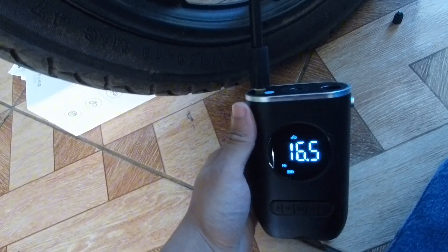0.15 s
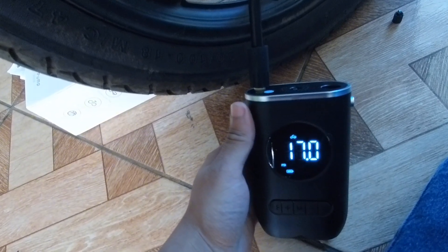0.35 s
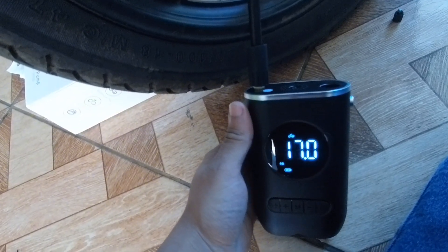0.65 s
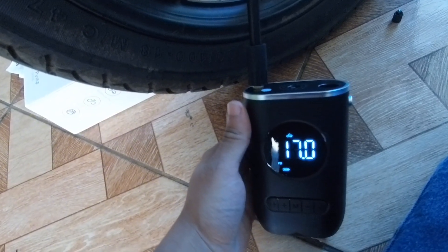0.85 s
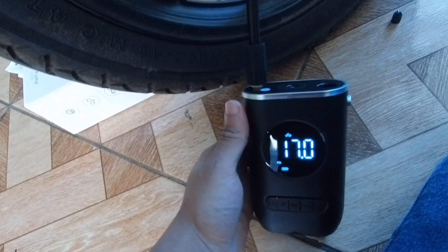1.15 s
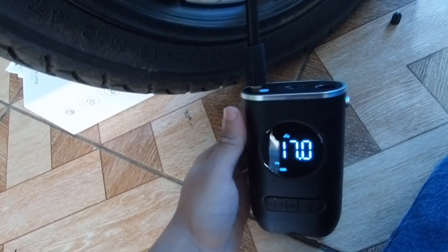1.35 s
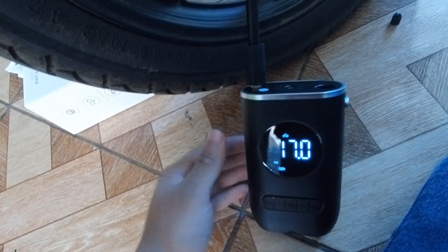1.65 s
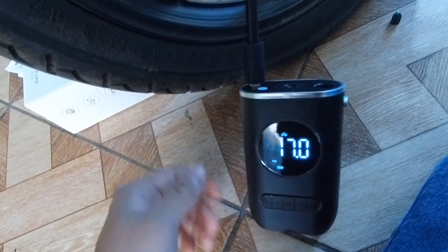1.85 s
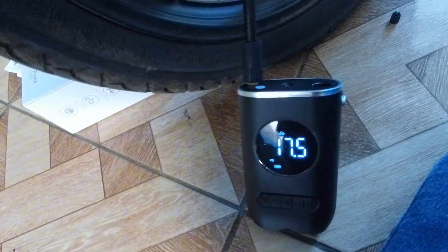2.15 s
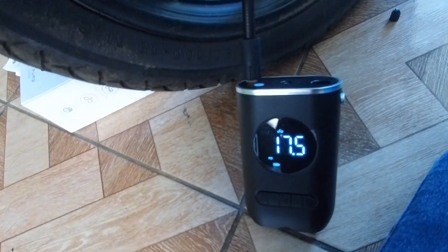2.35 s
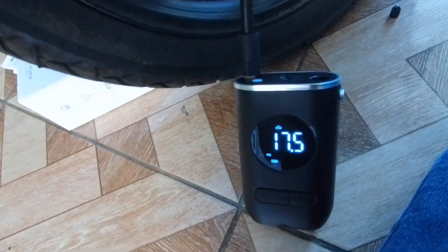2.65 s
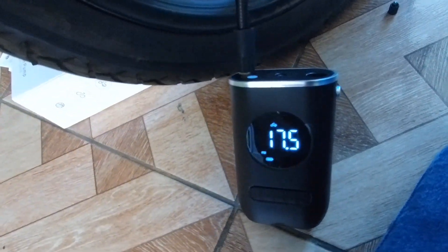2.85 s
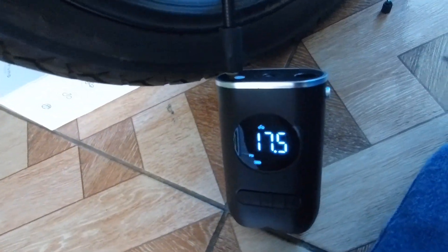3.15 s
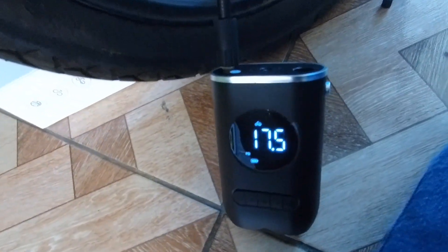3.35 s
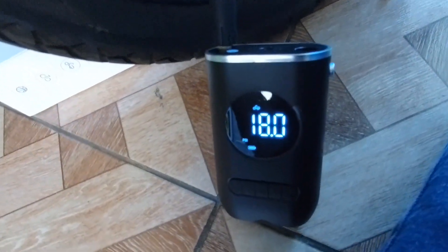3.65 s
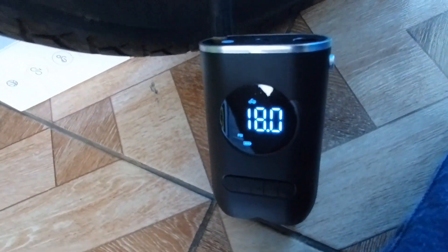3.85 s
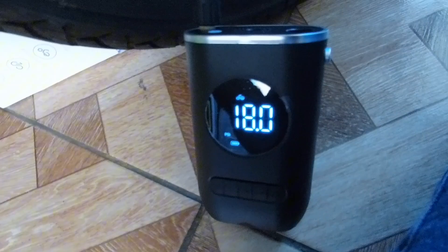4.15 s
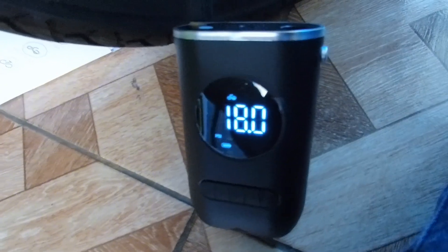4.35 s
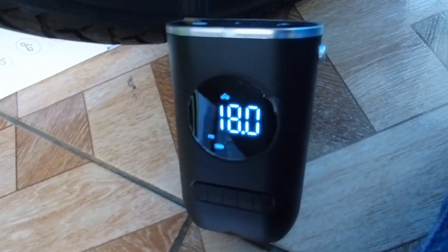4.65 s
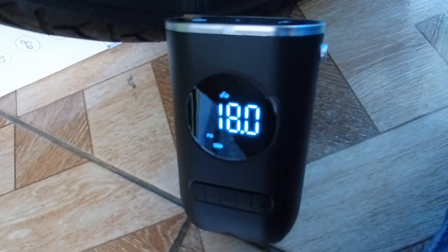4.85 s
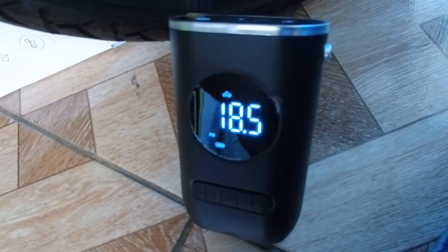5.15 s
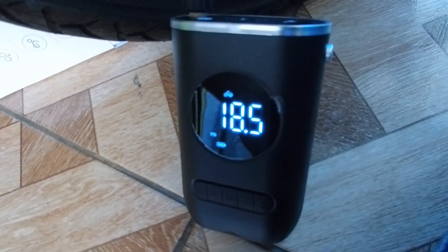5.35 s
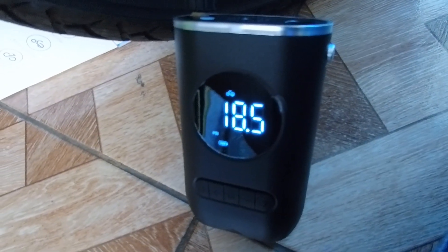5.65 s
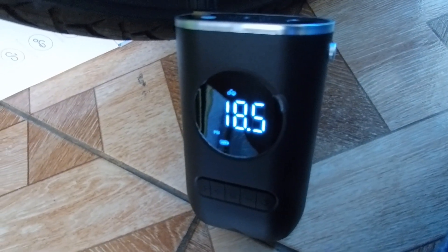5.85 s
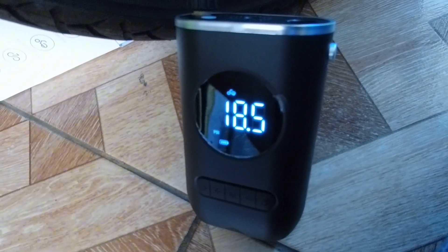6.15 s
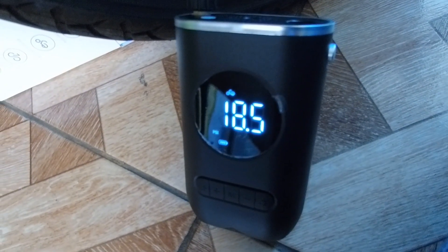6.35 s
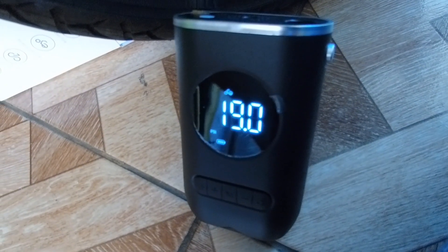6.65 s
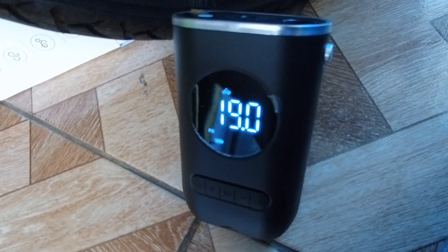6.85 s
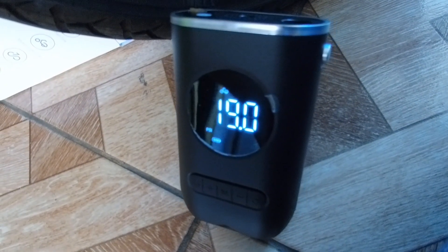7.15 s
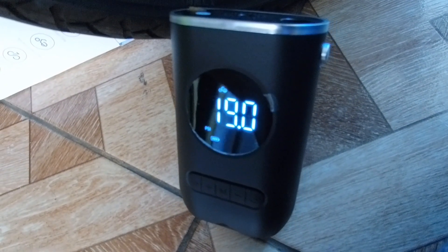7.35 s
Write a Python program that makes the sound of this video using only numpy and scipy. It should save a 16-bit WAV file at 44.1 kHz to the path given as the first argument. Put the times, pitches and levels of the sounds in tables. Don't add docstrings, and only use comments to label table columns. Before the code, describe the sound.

A small battery piston air pump is already running and never stops, filling a tyre on a tiled floor. About fifty-five valve pops a second merge into a harsh, low buzzing drone, with hollow ringing of the plastic case around the middle range, a thin gear whine near 2.5 kHz and steady pulsing air hiss. From 0 to 1.3 s it is hand-held and even; by about 1.8 s the hand has let go. Between 2 and 4 s it leans and rocks, the pitch dipping very slightly, with looser buzzing and rattling around 3.1 to 4.1 s. The phone microphone approaches from about 3 s, louder by 4 s. From 4.3 to 6 s whine and hiss brighten strongly on the left, with a faint loose-cover ring peaking near 5.6 s. After 6.1 s that brightness drops back, and the close, dry drone continues to the abrupt end at 7.5 s.

```python
import sys
import numpy as np
from scipy import signal
from scipy.fft import rfft, irfft, next_fast_len
from scipy.io import wavfile
from scipy.ndimage import map_coordinates

SR = 44100
rng = np.random.default_rng(int(sys.argv[2]) if len(sys.argv) > 2 else 0)


def to_wav(sig):
    pcm = np.clip(np.atleast_2d(sig), -1, 1) * 32767
    pcm = np.round(pcm).astype(np.int16)
    wavfile.write(sys.argv[1], SR, pcm.T)


def volts(x):
    e = np.asarray(x, float) / 20
    return 10 ** e


N = 331191


def unit(x):
    return x / np.sqrt(np.mean(x ** 2) + 1e-20)


def along(points, hz):
    point_hz, values = np.transpose(points)
    return np.interp(np.log(hz + 1), np.log(point_hz + 1), values)


def curves(rows):
    start_s, *columns = np.transpose(rows)
    return [np.interp(np.arange(N) / SR, start_s, column) for column in columns]


def wobble(rate):
    knots = rng.standard_normal(int(N * rate / SR) + 4)
    return map_coordinates(knots, [np.arange(N) * rate / SR])


def filtered(x, response):
    size = next_fast_len(N + SR // 2)
    return irfft(rfft(x, size) * response(np.fft.rfftfreq(size, 1 / SR)), size)[..., :N]


def hiss(spectrum):
    return unit(filtered(rng.standard_normal(N), lambda hz: volts(along(spectrum, hz))))


def modes(table):
    def response(f):
        total = 0
        for k, (hz, width, db) in enumerate(table):
            total = total + (-1) ** k * volts(db) * 1j * f * width / (hz * hz - f * f + 1j * f * width)
        return total
    return response


def struck(table, delay_ms, first, second, after_ms):
    def wait(f, ms):
        return np.exp(-2j * np.pi * f * ms / 1000)
    return lambda f: modes(table)(f) * wait(f, delay_ms) * (first + second * wait(f, after_ms))


def hump(turn, centre, width):
    return np.exp((np.cos(2 * np.pi * (turn - centre)) - 1) / (2 * np.pi * width) ** 2)


def pulses(turn, centre, jitter, scatter_db):
    count = np.arange(int(turn[-1]) + 1)
    luck = rng.standard_normal((len(count), 2))
    late = jitter[(count * (N - 1) / turn[-1]).astype(int)] * luck[:, 0]
    at = np.interp(count + centre + late, turn, np.arange(N))
    taps = np.floor(at)[:, None] + np.arange(-7, 9)
    offset = taps - at[:, None]
    shape = np.sinc(offset) * np.cos(np.pi * offset / 16) ** 2
    shape = shape * (at < N - 1)[:, None] * volts(scatter_db * luck[:, 1:])
    return np.bincount(np.clip(taps, 0, N - 1).astype(int).ravel(), shape.ravel(), N)


def panned(x, lr_db):
    gains = volts([lr_db / 2, -lr_db / 2])
    return x * gains / np.mean(gains, axis=0)


# start_s, leaning [0-1], phone_near [0-1], rattle [0-1]
POSTURE = [(0, 0.18, 0.09, 0), (1.7, 0, 0.05, 0.12), (2, 0.38, 0.22, 0.07), (2.33, 0.15, 0.13, 0.16),
           (2.42, 0.83, 0.22, 0), (3.02, 0.63, 0.26, 0.1), (3.1, 0.24, 0.2, 1), (3.27, 0.16, 0.58, 0.15),
           (3.35, 0.66, 0.35, 0.6), (3.58, 0.5, 0.3, 0.55), (3.66, 0.05, 0.76, 0.4), (3.85, 0, 0.57, 0.45),
           (4.04, 0.1, 0.77, 0.9), (4.2, 0.14, 0.82, 0), (5.6, 0.12, 0.92, 0.02), (6.1, 0.16, 0.78, 0.17),
           (7.51, 0.03, 0.82, 0.4)]


def posture():
    return [np.clip(c, 0, 1) for c in curves(POSTURE)]


# start_s, nearness_db, left_port_facing_vents [0-1]
PHONE_PATH = [(0, 0, 0.11), (1.9, 0.5, 0), (2.6, 0.5, 0.15), (3.1, 0.5, 0), (4.1, 3.5, 0),
              (4.34, 3.5, 0.48), (4.5, 3.5, 0.74), (4.7, 4, 0.7), (5.1, 5, 0.79), (5.35, 4, 0.89),
              (5.62, 4, 0.98), (5.8, 4.5, 0.96), (6.0, 3.5, 0.99), (6.1, 3.5, 0.17), (6.25, 3.5, 0.05),
              (7.51, 4.5, 0.22)]


def level(base_db, in_hand, leaning, near, facing, sharp=1):
    let_go_s, let_go_takes_s = 1.3, 0.55
    held = np.clip((let_go_s + let_go_takes_s - np.arange(N) / SR) / let_go_takes_s, 0, 1)
    leans, nears = curves(POSTURE)[:2]
    faces = np.clip(curves(PHONE_PATH)[1], 0, 1.2) ** sharp
    return base_db + in_hand * held + leaning * leans + near * nears + facing * faces


# start_s, crank_turns_per_s
CRANK_SPEED = [(0.0, 55.13), (1.02, 54.89), (1.29, 54.99), (2.34, 54.93), (2.48, 54.13), (2.96, 54.23),
               (3.18, 55.05), (3.29, 55.02), (3.4, 54.23), (3.58, 54.41), (3.68, 55.0), (3.79, 55.1),
               (4.02, 54.77), (4.17, 54.95), (4.67, 54.68), (4.94, 54.66), (6.03, 54.71), (7.51, 54.49)]


def crank():
    return np.cumsum(curves(CRANK_SPEED)[0]) / SR + .982


# pitch_hz, level_db [per Hz]
AIR_FLOW = [(1030, -53), (1750, -5.5), (2030, -5), (2480, -4.5), (2700, -4.5), (2920, -2), (3050, -6),
            (3410, -2), (4320, -9.5), (5390, -11.5), (6630, -14.5), (7250, -15.5), (8200, -34),
            (10700, -59), (18000, -120)]
# pitch_hz, level_db [per Hz]
AIR_FIZZ = [(4470, -17), (7600, -1.5), (7880, -3.5), (9360, -7), (9910, -13), (10100, -10.5), (10900, -9.5),
            (11600, -12.5), (13300, -13), (15500, -16)]
# pitch_hz, width_hz, level_db
VENT_SLOTS = [(8330, 300, 8), (9400, 230, 4.5), (9700, 150, -7), (10700, 300, -4), (12400, 500, -10),
              (13200, 600, -27), (5860, 280, 10)]


def air(turn):
    lr_db = level(14.5, in_hand=-3, leaning=-2, near=1.8, facing=10, sharp=1.7)
    puff = 0.9 + .5 * hump(turn, 0.12, 0.12) + 0.19 * hump(turn, 0.83, 0.077)
    flow = np.array([unit(puff * hiss(AIR_FLOW)) * volts(port_db) for port_db in (4.5, -3)])
    flow_db = level(-52, in_hand=1, leaning=-0.4, near=-1.5, facing=2, sharp=1.8) + 0.58 * wobble(25)

    left, right = [unit((puff + 0.062) * hiss(AIR_FIZZ)) for port in range(2)]
    facing = np.clip((lr_db - 14.5) / 11, 0, 1)
    whistles = unit(filtered(puff * rng.standard_normal(N), modes(VENT_SLOTS)))
    fizz = np.array([(1 - 0.34 * facing) * left + facing * whistles, right])
    fizz_db = level(-61, in_hand=1, leaning=0.4, near=-2, facing=5, sharp=3.2) + 0.7 * wobble(25)
    return volts(flow_db) * flow + panned(volts(fizz_db) * fizz, lr_db)


# start_s [middle of the ringing], pitch_hz, level_db, half_length_s
COVER_RINGS = [
    (2.418, 1406, -46, .06),
    (2.7, 1407, -49, .25),
    (3.45, 1430, -51, 0.11),
    (4.05, 1384, -50, .05),
    (4.9, 1314, -47, .1),
    (5.25, 1296, -44, 0.12),
    (5.628, 1315, -39, .06),
]


def cover(turn):
    pops = pulses(turn, 0.049, np.full(N, .002), scatter_db=2.0)
    t = np.arange(N) / SR
    out = np.zeros(N)
    for middle_s, hz, db, half_s in COVER_RINGS:
        ring = unit(filtered(pops, lambda f: modes([(hz, 110, 0)])(f) ** 2))
        out = out + volts(db) * np.exp(-((t - middle_s) / half_s) ** 2) * ring
    return out


# pitch_hz, width_hz, level_db
BRACKET_CLOSE = [(2760, 82, -11.5), (3366, 110, 10), (3580, 124, 6), (3610, 530, -3.5)]
# pitch_hz, width_hz, level_db
BRACKET_DISTANT = [(3104, 130, -4), (3650, 66, 2), (4100, 240, -5.5), (4550, 62, -5.5)]
# pitch_hz, width_hz, level_db
BRACKET_CHATTER = [(3430, 500, 1), (4130, 460, -3)]


def bracket(turn, leaning, near):
    steady = np.full(N, .0012)
    knocks = pulses(turn, 0.0599, steady, scatter_db=2.0)
    knocks = knocks + 0.5 * pulses(turn, .24, steady, scatter_db=-0.5)
    knocks = knocks + 0.0071 * hump(turn, 0.27, 0.084) * rng.standard_normal(N)
    close = unit(filtered(knocks, modes(BRACKET_CLOSE)))
    distant = unit(filtered(knocks, modes(BRACKET_DISTANT)))
    rubbing = (.5 + hump(turn, .1, 0.19)) * rng.standard_normal(N)
    chatter = unit(filtered(rubbing, modes(BRACKET_CHATTER)))
    return near * close + (1 - near) * 0.91 * distant + 0.79 * leaning * chatter


# pitch_hz, width_hz, level_db
CLACK_UPRIGHT = [(2245, 41, -9), (2320, 56, -6.5), (2200, 61, -15.5), (2478, 24, -3), (2573, 25, 0),
                 (2753, 37, -0.5), (2770, 99, -0.7)]
# pitch_hz, width_hz, level_db
CLACK_TIPPED = [(2034, 78, -15), (2520, 23, -2), (2575, 53, -5), (2637, 33, -4.5), (2700, 145, -13),
                (2820, 44, 0.5), (2970, 9.3, -19)]
# pitch_hz, width_hz, level_db
HOUSING_RING = [(2464, 32, 3)]


def gears(turn):
    leaning, near, _ = posture()
    near = near * np.clip((curves(PHONE_PATH)[0] - 2.6) / 0.82, 0, 1)
    teeth = 45
    mesh = 2 * np.pi * teeth * turn + 1.75 * np.sin(2 * np.pi * (turn - .58)) + 0.2 * wobble(60)

    load = hump(turn, 0.94, 0.042) + 0.83 * hump(turn, 0.23, 0.031) + 0.12 * hump(turn, 0.33, 0.085) + 0.11
    tone = load * np.sin(mesh) * volts(wobble(40))
    tone = tone + filtered(tone, modes(HOUSING_RING))
    clacks = pulses(turn, .9, np.full(N, .0006), scatter_db=.8)
    upright, tipped = [unit(filtered(clacks, modes(t))) for t in (CLACK_UPRIGHT, CLACK_TIPPED)]
    first = near * unit(tone) + np.clip(1 - near - leaning, 0, 1) * upright + leaning * tipped

    squeeze = hump(turn, 0.942, 0.061)
    second = (squeeze + 0.15) * np.sin(2 * mesh) * volts(0.49 * wobble(50))
    third = (squeeze + 0.78 * hump(turn, 0.13, 0.03) + 0.065) * np.sin(3 * mesh) * volts(1.3 * wobble(50))
    fourth = (squeeze + .3) * np.sin(4 * mesh) * volts(2.2 * wobble(50))
    overtones = unit(third) + volts(-9.0 + 1.7 * near) * unit(second) + volts(-16) * unit(fourth)

    mesh_db = level(-55, in_hand=4.5, leaning=1, near=5, facing=9.5) + 0.57 * wobble(9)
    bracket_db = level(-54.5, in_hand=-3, leaning=2, near=0.9, facing=3.5) + 1.2 * wobble(9)
    overtone_db = level(-58, in_hand=.3, leaning=-3, near=-0.8, facing=8.5, sharp=4.2) + wobble(12)
    whine = volts(mesh_db) * first + volts(bracket_db) * bracket(turn, leaning, near)
    whine = whine + volts(overtone_db) * overtones
    return panned(whine, level(8.3, in_hand=4.1, leaning=4.1, near=3.3, facing=13))


# pitch_hz, level_db [per Hz]
LOOSE_PARTS = [(30, -40), (60, -31), (280, -21), (500, -18), (620, -8), (740, 0), (850, -6), (1080, -14),
               (1370, -2), (1560, -8), (1700, -17), (2400, -22)]


def buzzing(turn, rattle):
    gate = 0.44 + 0.82 * hump(turn, 0.14, 0.067) + 0.74 * hump(turn, 0.39, 0.019)
    gate = gate + 0.82 * hump(turn, 0.98, 0.026)
    return gate * volts(6 * rattle + .6 * wobble(14)) * hiss(LOOSE_PARTS)


# pitch_hz, width_hz, level_db
THUMP_DISTANT = [(103, 38, -5.5), (251, 92, -0.05), (418.4, 222, 5.5), (467.5, 114, 5.5)]
# pitch_hz, width_hz, level_db
THUMP_CLOSE = [(100, 18, -8.5), (268.2, 138.5, 16), (276.5, 175.4, 15), (486, 25, -1.5)]
# pitch_hz, width_hz, level_db
WALLS_UPRIGHT = [(567.2, 33.2, 8.5), (632.5, 87.5, 9), (716, 97, 5), (845.7, 86, 4), (870.3, 79, 1.16),
                 (1024, 95, 1.1), (1202, 25, -5), (1350, 170, -12), (1380, 25, -10), (1561, 65, -3.5),
                 (1637, 49, -3.5), (1850, 98, -3.5)]
# pitch_hz, width_hz, level_db
WALLS_LEANING = [(580.8, 45, 7.5), (576, 116, 0.2), (688, 33.5, 10.5), (795, 179, 13.5), (794, 89, 16.0),
                 (937.7, 22, 14.5), (951, 75, 16), (1024.3, 26.5, 10), (1348, 108, -4.5), (1370, 29, -15),
                 (1559, 26, 11), (1568, 40, 2.5)]
# pitch_hz, width_hz, level_db
WALLS_CLOSE = [(594, 48.3, 4), (636.3, 40, 4), (725.7, 82.2, 9.0), (750.7, 68.2, 12.5), (965, 180, -6),
               (1154, 62, -4.5), (1169, 160, -0.7), (1223, 166, -1.5), (1392.5, 32, 5.5), (1428, 69.4, 4),
               (1440, 30, 9), (1592, 20, -4)]
# start_s, level_db
TILE_CONTACT = [(0, 0.5), (1.67, 1), (1.9, -1), (2.3, -0.5), (3.05, 0), (3.12, 2), (3.39, 0.5), (4.0, 0.5),
                (4.5, 1), (5.3, -1.5), (5.6, -1.5), (6.15, 0.5), (7.51, -1)]


def case(turn):
    leaning, near, rattle = posture()
    limp = (0.00028 + 0.002 * near) * np.cos(np.pi * turn + 1.4 * wobble(3.9))
    pops = pulses(turn + limp, .974, jitter=.0004 + 0.0025 * rattle ** 2, scatter_db=.3)
    thumps = [filtered(pops, struck(THUMP_DISTANT, 0, 1, 0.48, 8.726)),
              filtered(pops, struck(THUMP_CLOSE, 0.12, 0.97, 0.46, 8.504))]
    walls = [filtered(pops, struck(WALLS_UPRIGHT, .75, 1, 1.38, 2.37)),
             filtered(pops, struck(WALLS_LEANING, .61, -1, -.69, 3.51)),
             filtered(pops, struck(WALLS_CLOSE, 1.37, 1, -.45, 8.18))]
    thump_shares = [1 - near, near]
    wall_shares = [np.clip(1 - leaning - near, 0, 1), leaning, near]
    buzz = buzzing(turn, rattle)

    thump_db = level(-50.5, in_hand=0.5, leaning=-0.5, near=-0.5, facing=0)
    ring_db = level(-41, in_hand=-0.55, leaning=-0.6, near=-0.27, facing=1.6) + curves(TILE_CONTACT)[0]
    lid_db = level(-49, in_hand=2, leaning=5.5, near=0, facing=3.5, sharp=3.9)
    lid_db = lid_db + 0.88 * curves(PHONE_PATH)[1] * wobble(12)
    out = volts(thump_db - 16) * np.sin(2 * np.pi * turn) * volts(.3 * wobble(12))
    # low_hz, high_hz, level_db, buzz_db, sounds, shares
    parts = [(80, 480, thump_db, -21, thumps, thump_shares),
             (480, 1150, ring_db, -12.5, walls, wall_shares),
             (1150, 1740, lid_db, -7, walls, wall_shares)]
    for low_hz, high_hz, level_db, buzz_db, sounds, shares in parts:
        def band(hz):
            return 1 / (1 + (hz / high_hz) ** 16) - 1 / (1 + (hz / (low_hz + 1)) ** 16)
        ring = sum(share * unit(filtered(sound, band)) for share, sound in zip(shares, sounds))
        out = out + volts(level_db) * (ring + volts(buzz_db) * unit(filtered(buzz, band)))
    return out


def port_lag(hz):
    return np.exp(-2j * np.pi * hz * np.array([[-2], [2]]) / SR)


# pitch_hz, left_minus_right_db
PORT_BALANCE = [(60, 2.5), (130, 2.5), (290, 2), (640, 1.5), (1410, 2), (3100, -28), (6820, 10.0),
                (15000, 10.0)]


def port_pair(hz):
    return port_lag(hz) * volts(np.array([[.5], [-.5]]) * along(PORT_BALANCE, hz))


def scene():
    turn = crank()
    nearness = volts(curves(PHONE_PATH)[0])
    body = case(turn) + cover(turn) / nearness
    return nearness * (air(turn) + filtered(gears(turn), port_lag) + filtered(body, port_pair))


def band_limit(x):
    return signal.sosfilt(signal.butter(12, 15640, fs=SR, output="sos"), x)


def record(dry):
    return band_limit(dry)


dry = scene()
out = record(dry)
to_wav(out)
```